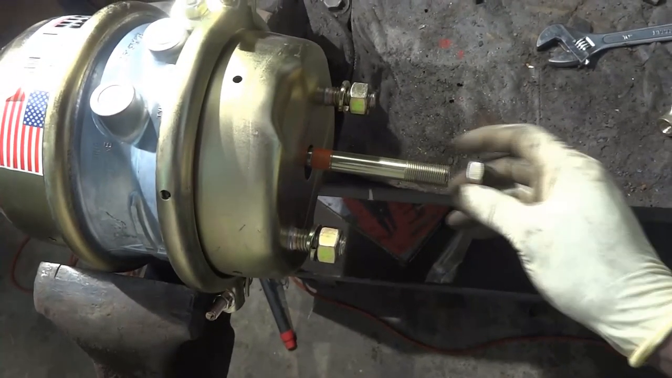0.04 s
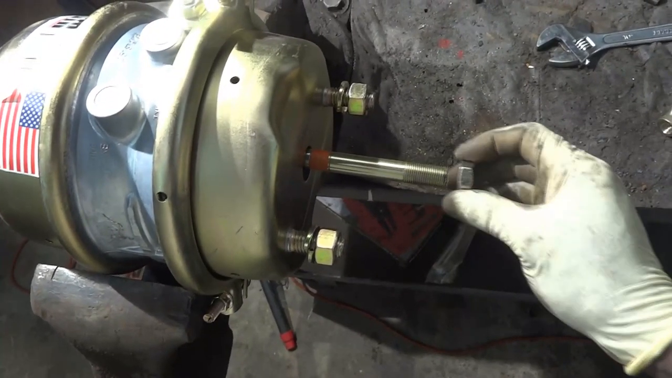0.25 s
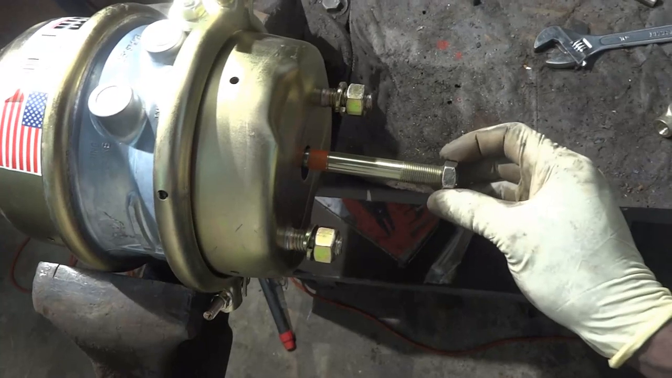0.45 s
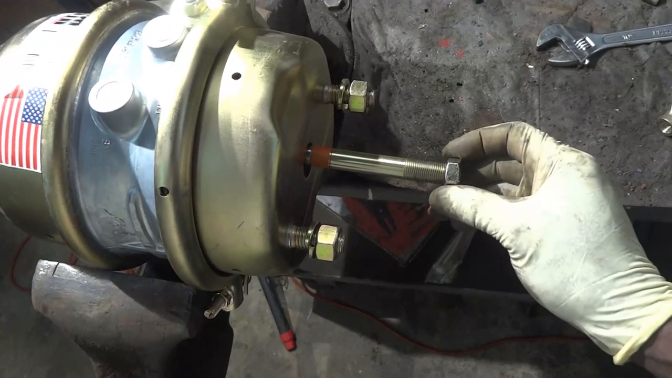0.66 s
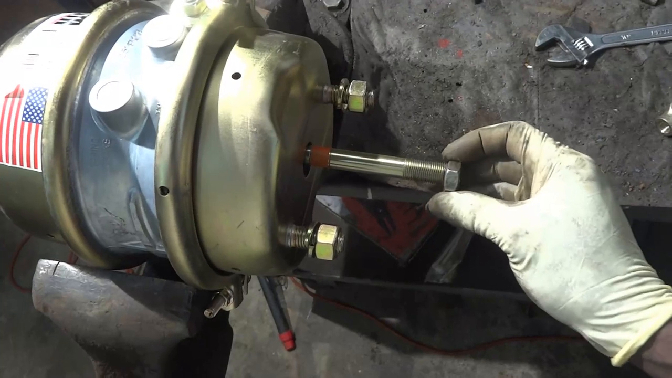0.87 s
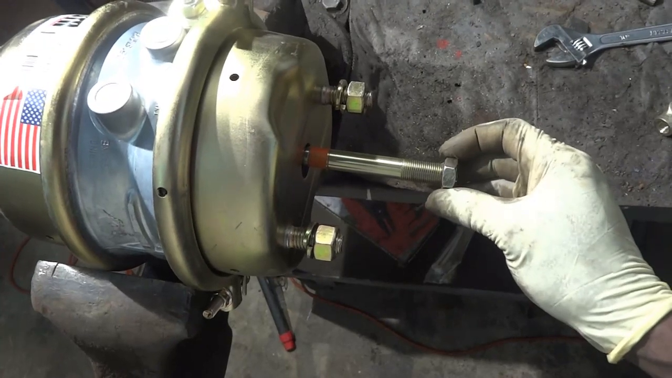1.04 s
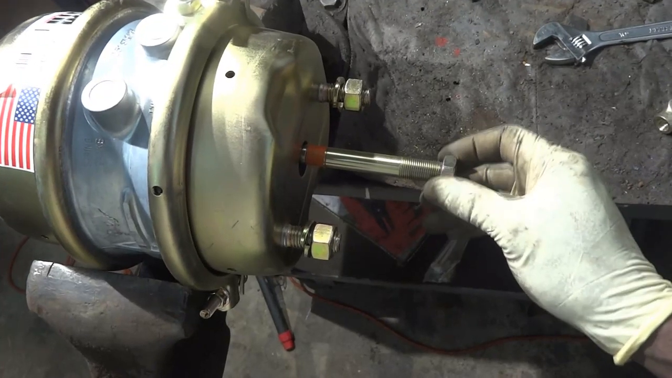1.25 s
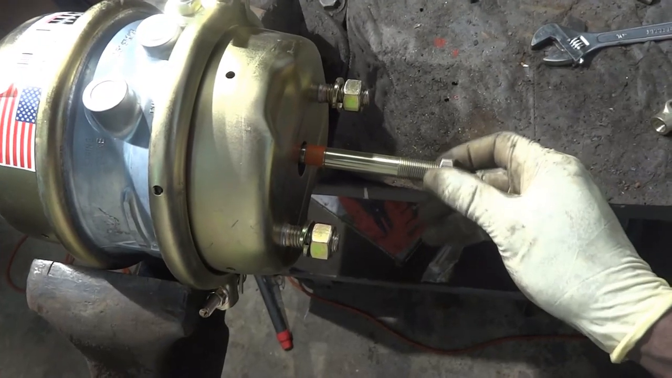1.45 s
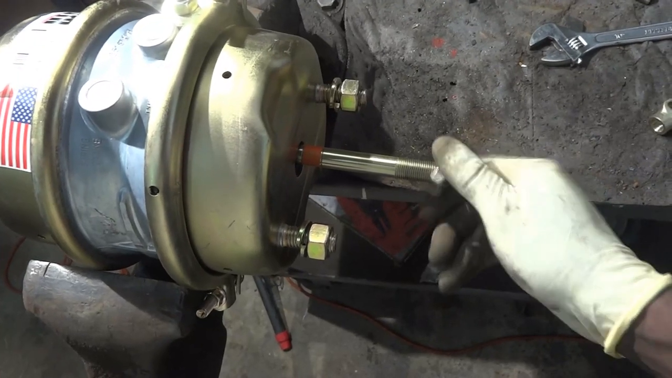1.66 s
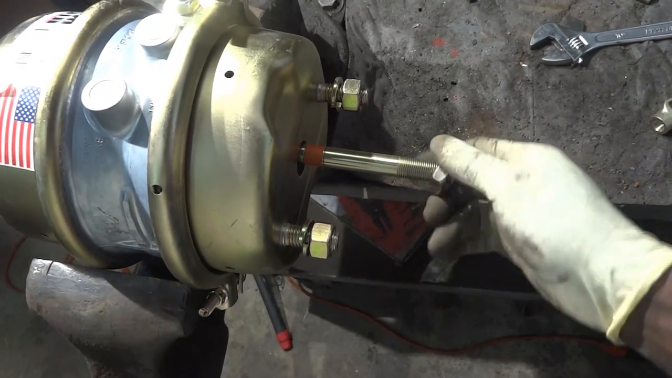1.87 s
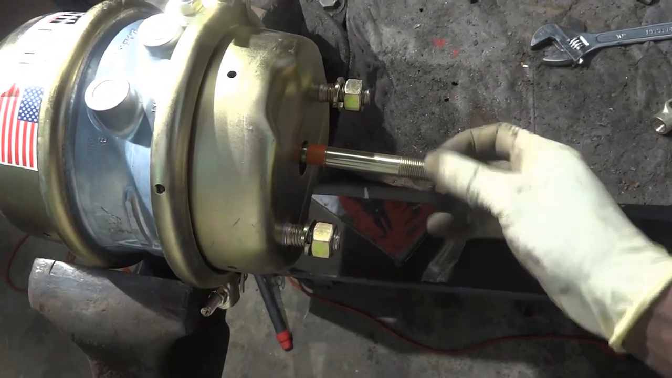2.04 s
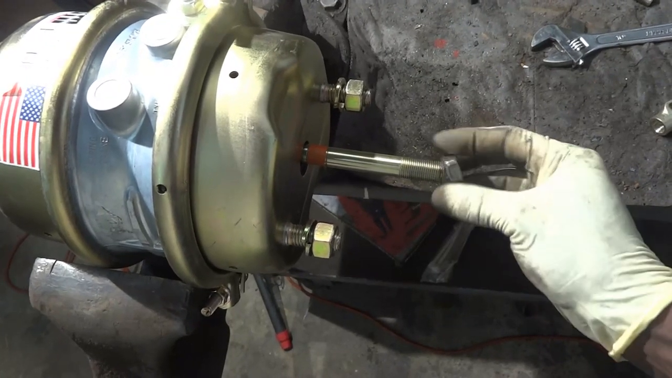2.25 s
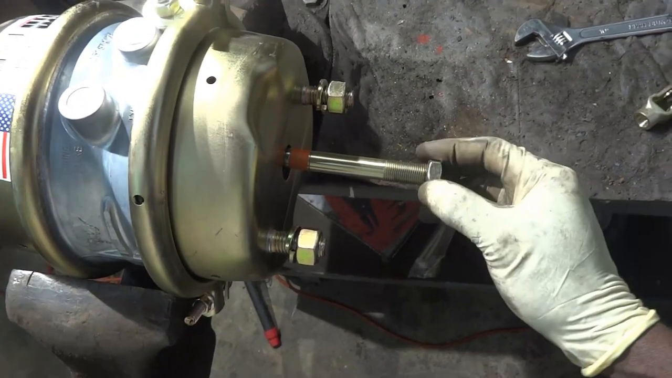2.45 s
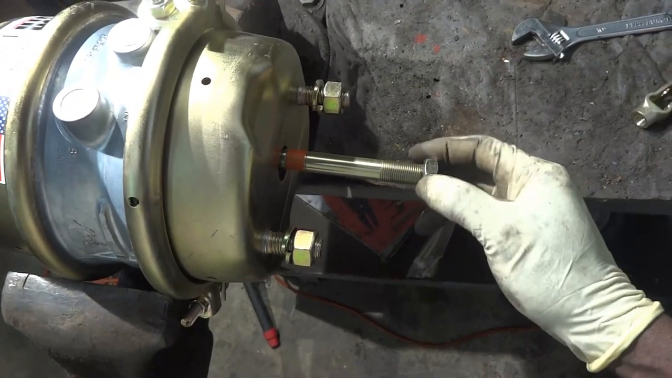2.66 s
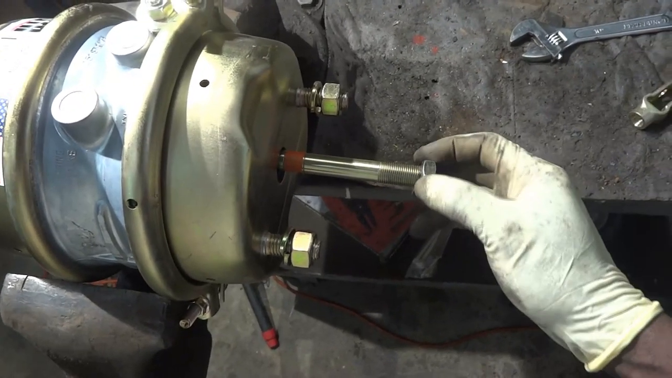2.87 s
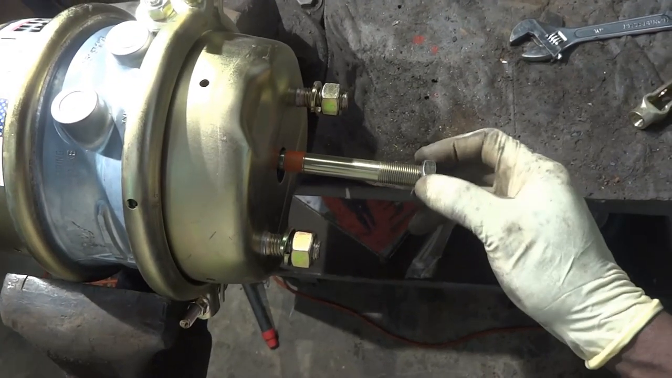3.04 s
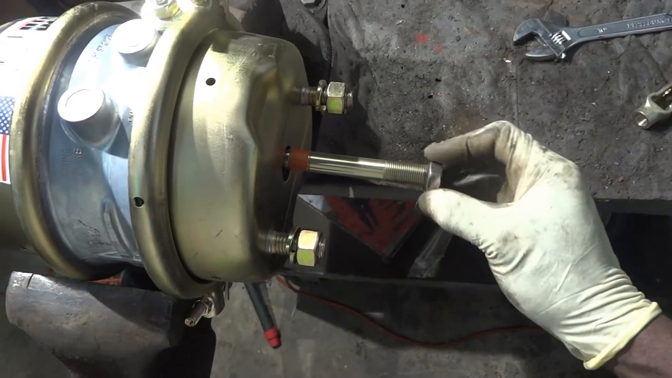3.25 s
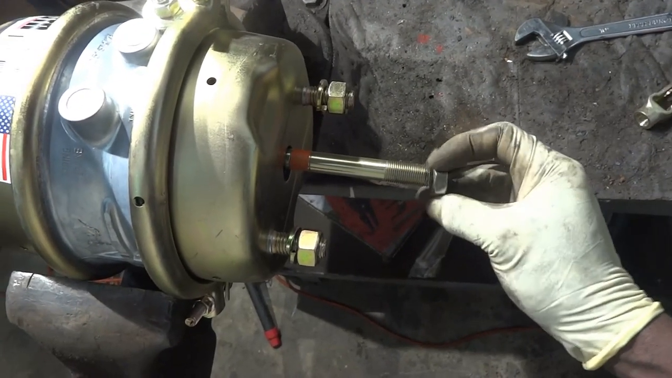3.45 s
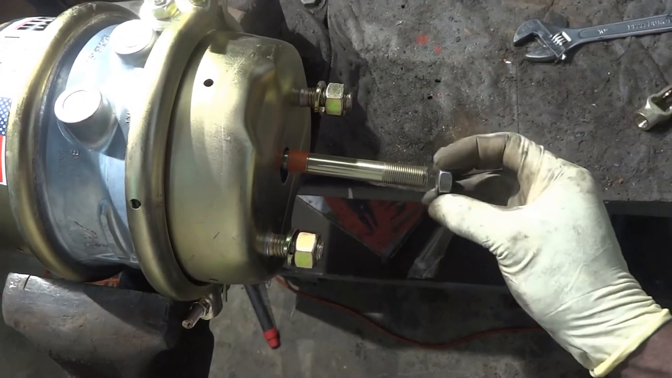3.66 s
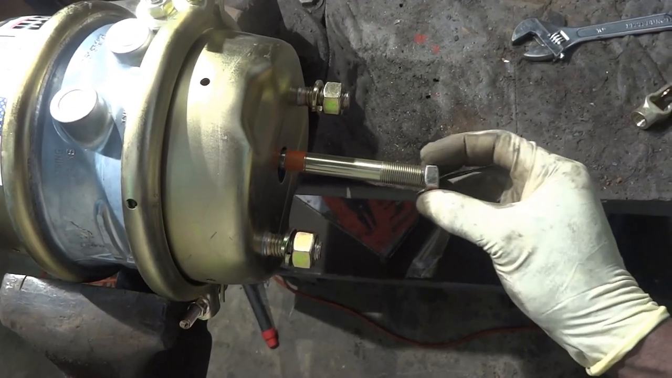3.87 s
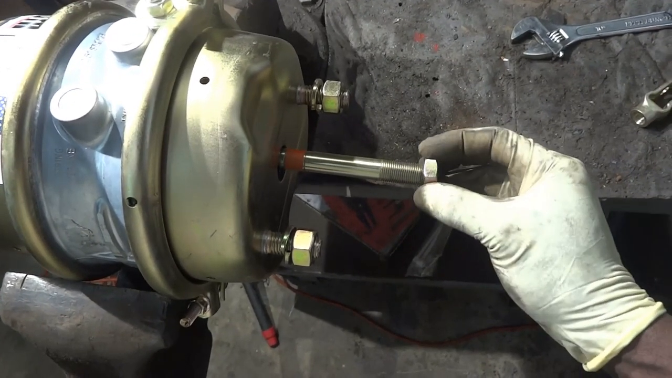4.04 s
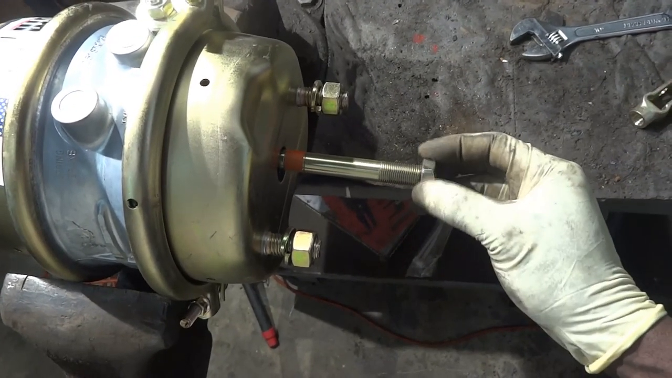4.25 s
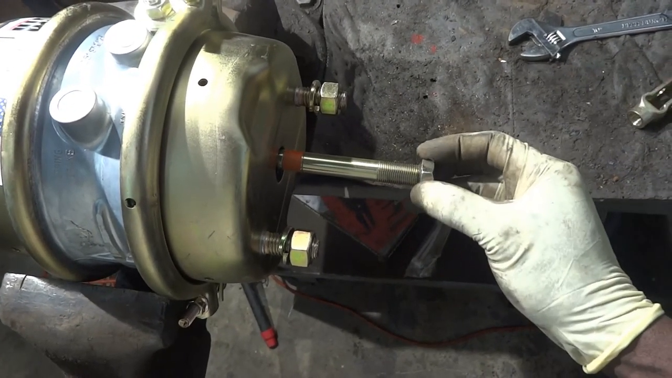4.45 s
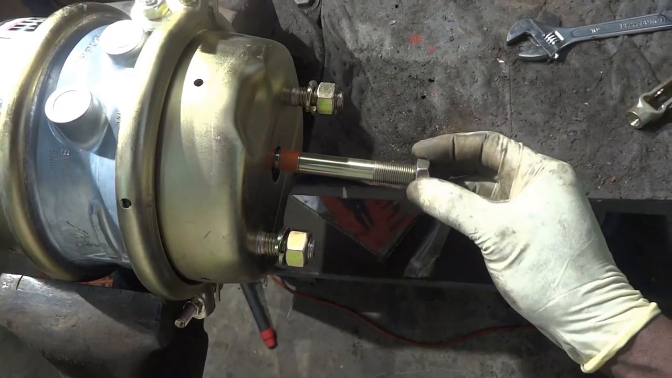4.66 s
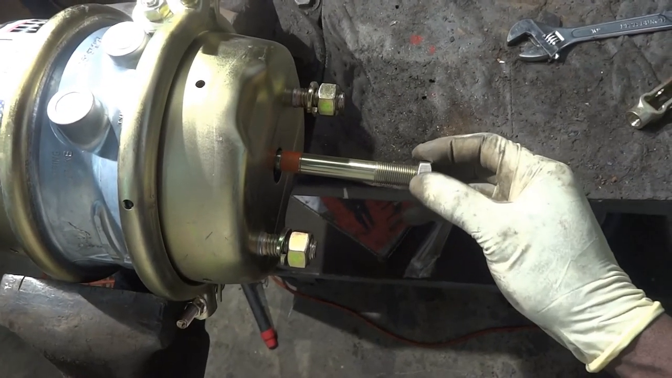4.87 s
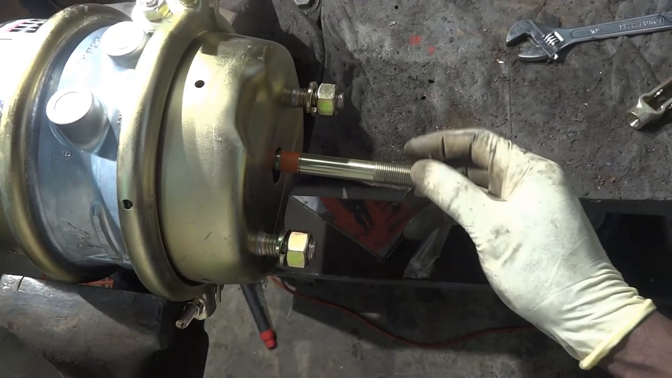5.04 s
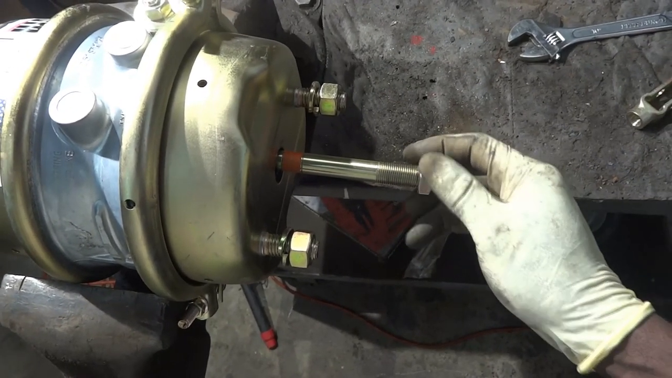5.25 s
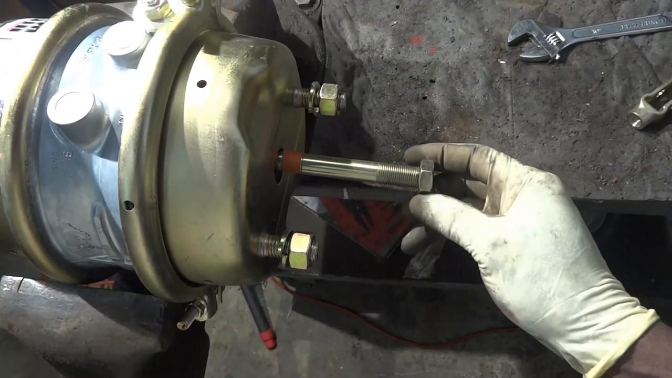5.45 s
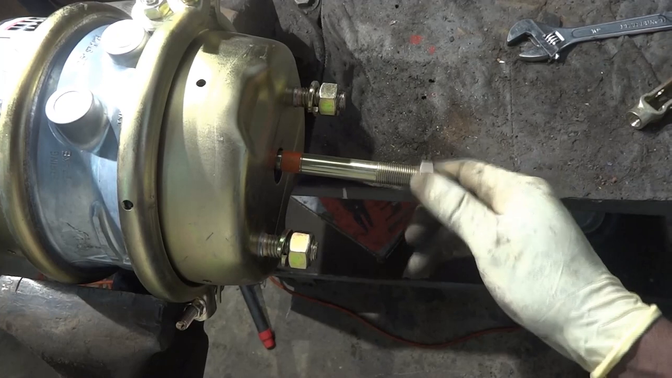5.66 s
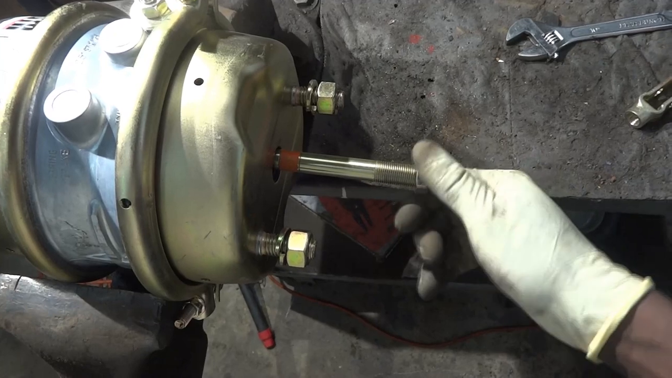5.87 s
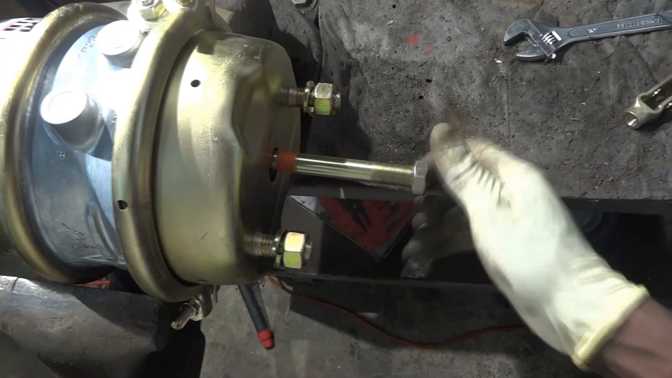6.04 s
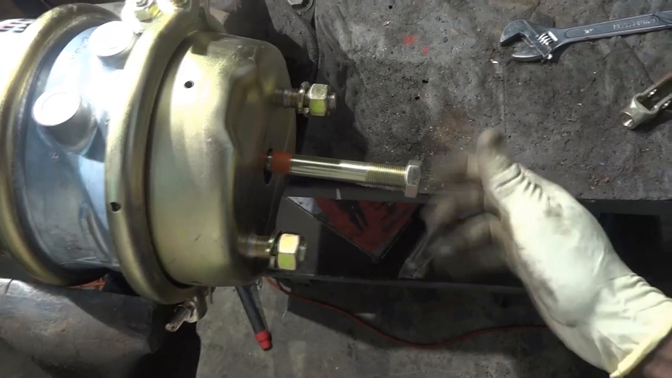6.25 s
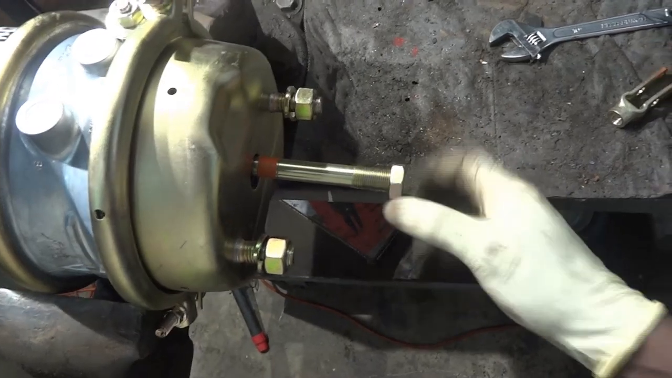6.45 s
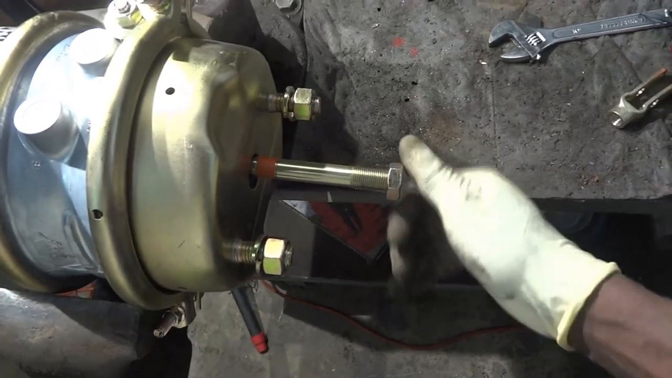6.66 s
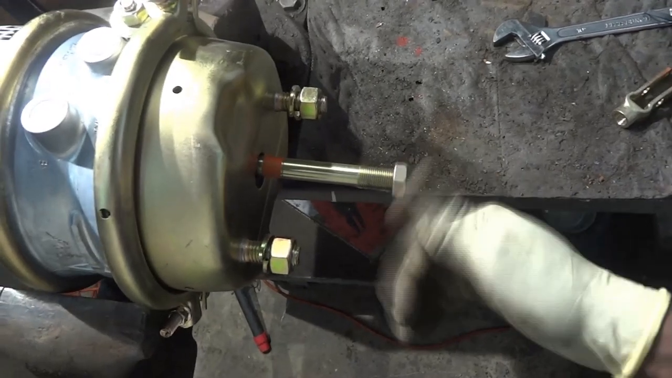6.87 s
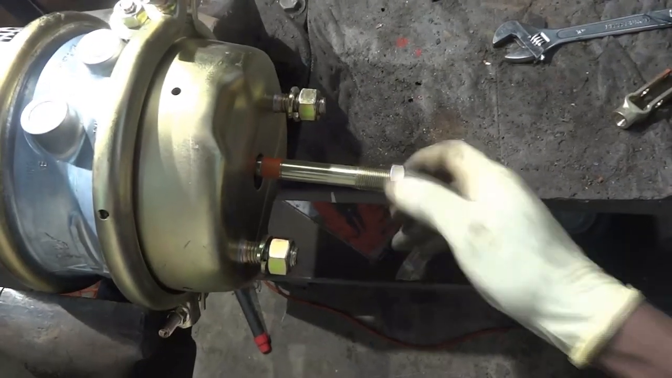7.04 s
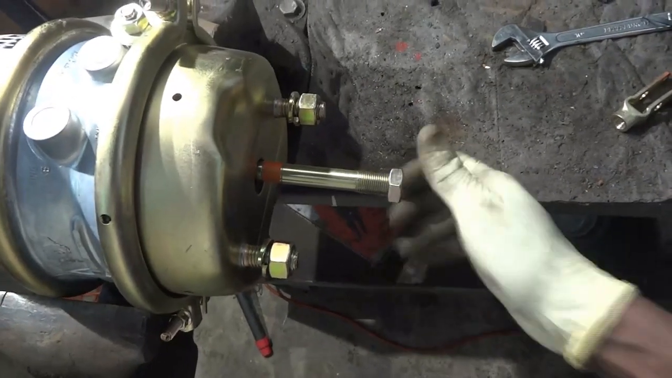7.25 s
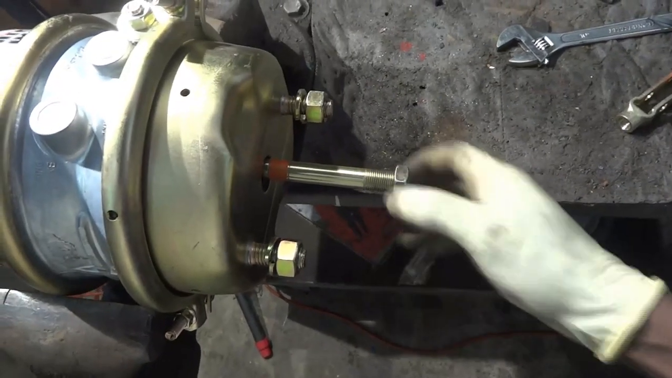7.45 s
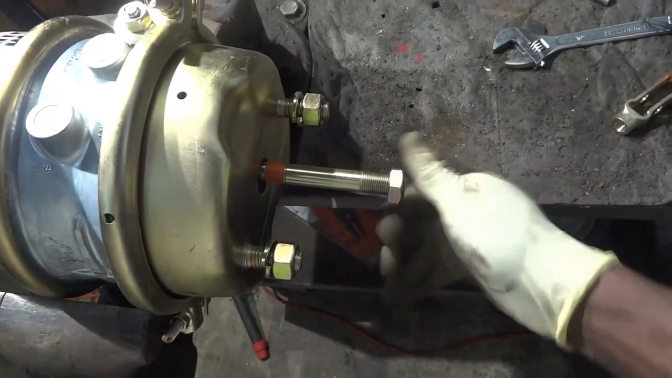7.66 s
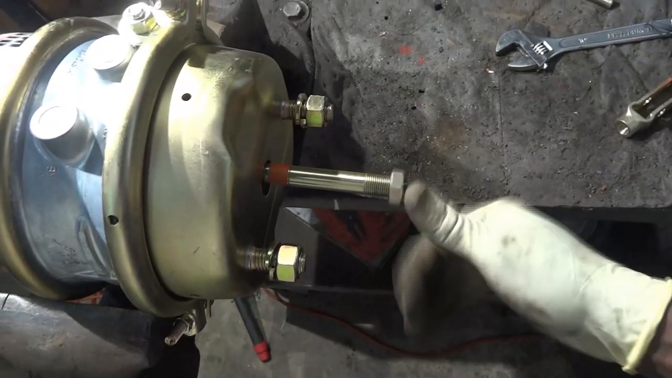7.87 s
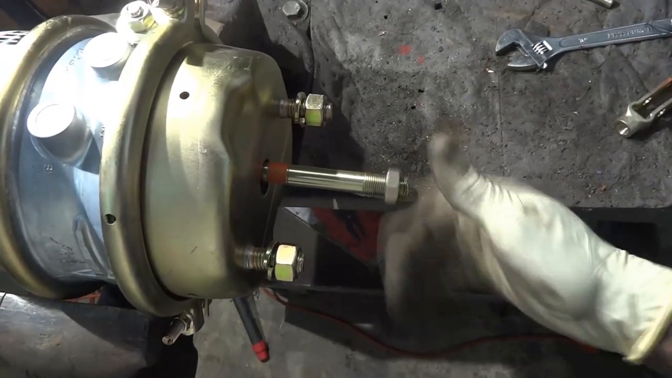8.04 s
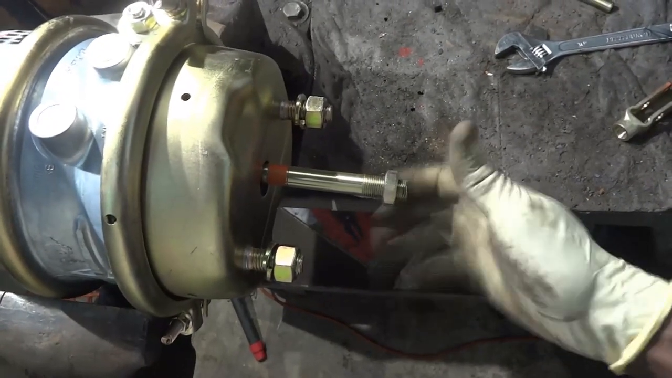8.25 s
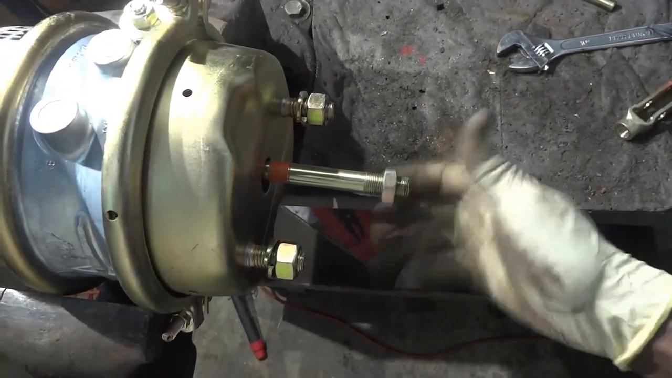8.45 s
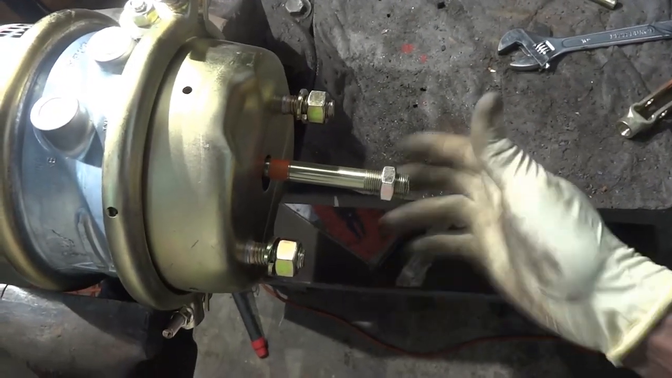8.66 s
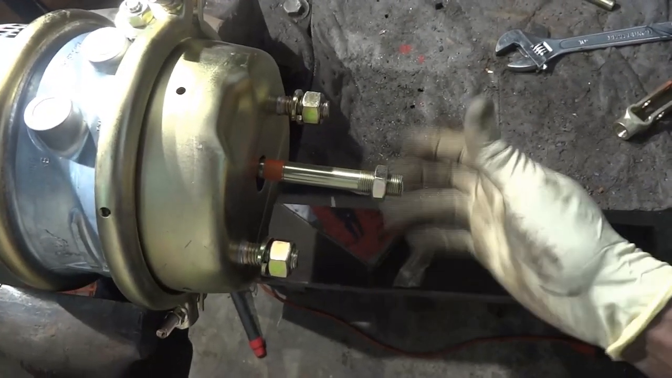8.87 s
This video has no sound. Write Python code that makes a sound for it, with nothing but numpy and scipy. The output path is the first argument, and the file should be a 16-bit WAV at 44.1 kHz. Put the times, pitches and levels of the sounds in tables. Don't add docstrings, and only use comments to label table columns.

```python
import sys
import numpy as np
from scipy import signal
from scipy.fft import rfft, irfft, next_fast_len
from scipy.io import wavfile
from scipy.ndimage import uniform_filter1d

SR = 44100
rng = np.random.default_rng(int(sys.argv[2]) if len(sys.argv) > 2 else 0)


def boost_factor(decibels):
    exponent = np.asarray(decibels, float) / 20
    return 10 ** exponent


def dump(signal):
    limited = np.clip(np.atleast_2d(signal).T, -1, 1)
    pcm = np.round(limited * 32767).astype(np.int16)
    wavfile.write(sys.argv[1], SR, pcm)


N = 392486

# (flicked [s], gripped [s], ring level [dB], rise [s])
FREE_SPINS = [
    (6.085, 6.19, -41, 0.02),
    (6.383, 6.398, -26.5, .02),
    (6.892, 6.984, -37, .01),
    (7.103, 7.146, -56, .01),
    (7.353, 7.512, -38, 0.011),
    (7.85, 8.016, -44, .005),
    (8.047, 8.196, -14.5, 0.0025),
    (8.286, 8.455, -24.5, 0.049),
    (8.515, 8.553, -29.5, 0.012),
    (8.805, 8.83, -46, .005),
]
# (frequency [Hz], level [dB], T60 [s])
HOUSING_MODES = [(108.3, -6.5, 0.17), (124.5, -6.5, 0.34), (214.8, 2.5, 0.19), (274.5, -5, 0.22),
                 (341.4, 1, 0.2), (517.4, -3, 0.11), (640, -7, 0.1)]
DRUM_MODES = [(756, -13, 0.08), (808, -10, 0.08), (851, 0.3, 0.089), (898, -0.5, 0.13), (917.8, 1, 0.13),
              (977, -5.5, 0.22), (1050, -6.5, 0.19)]
ROD_BEND_MODES = [(1728, -9, 0.17), (1936, -5, 0.14), (2025, 3.5, 0.081), (2071, 3, 0.13),
                  (2290, -7.5, 0.095), (2696, -10.5, 0.047)]
ROD_OVERTONE_MODES = [(3300, -8, .03), (3715, -10, .08), (3930, -5, .035), (4012, -4, .095),
                      (4160, -4, .04), (4320, -6, .03), (4960, -9, .025)]
NUT_MODES = [(5555, -9, 0.06), (6560, -2, 0.045), (7009, -14, .1), (7435, -4, 0.04), (7695, 3, 0.085),
             (9002, -13, 0.063), (11426, 4.5, 0.065), (14040, -9, 0.015)]
# (frequency [Hz], level [dB])
CRACK_SPECTRUM = [(300, -53), (700, -29), (1400, -22), (2800, -1), (4500, 3), (7000, -2), (11000, -5),
                  (15500, -6)]
# (frequency [Hz], level [dB])
GLOVE_SPECTRUM = [(1000, -0.5), (3000, 7.5), (8000, 9), (15500, -3)]
# (frequency [Hz], density [dB per Hz])
AIR_SPECTRUM = [(17, -36), (40, -1.5), (174, -3), (426, -4.5), (512, -6.5), (721, -10.5), (9460, -23),
                (16000, -24)]
# (frequency [Hz], side minus mid [dB])
AIR_WIDTH = [(60, -16), (300, -4), (1000, 6), (2400, 0), (5000, -2), (9000, -19)]
# (time [s], level [dB], centre [Hz])
GLOVE_SNAPS = [(2.446, -31.5, 2200), (5.92, -50, 13500), (5.94, -49, 13500), (6.117, -36, 9000),
               (6.334, -32, 9000), (6.602, -38, 10000), (6.842, -38, 12000), (7.855, -18, 13000),
               (8.78, -26, 13500), (8.808, -17, 13500), (6.501, -36, 8000), (6.515, -34, 6000),
               (6.589, -41, 9000), (7.003, -34, 11000), (7.143, -30, 12000), (7.345, -15, 12400),
               (7.521, -34, 4000), (8.205, -25, 4430), (8.315, -19, 11500), (8.775, -24, 7000)]
# (time [s], level [dB])
CHIMES = [
    (6.5, -60),
    (7.003, -52),
]
# (time [s], strength [dB], rod bending share [dB], hardness [dB], nut freedom [dB])
THREAD_TICKS = [(.382, -40, 5, -6, 9), (.78, -44, -5.5, -6, -3), (1.083, -40, -7, -7, 1.5),
                (1.184, -46, -5, .5, -15), (1.415, -43, 5, .5, -7), (1.614, -36, 3, 6.5, -3),
                (2.3, -53, 13, -14, 25), (2.378, -39, -6.5, 1.5, -4), (3.327, -43.5, 2.5, -10, 1.5),
                (3.54, -42, 9, -3.5, -1.5), (3.554, -34, 5, -11, 12), (4.145, -53, 6.5, 2.5, -11),
                (4.162, -34, -6.5, -1.5, -13), (4.261, -45, 2.5, -10.5, -3), (5.076, -49, 3, -2.5, 3)]
# (time [s], strength [dB], rod bending share [dB], hardness [dB], nut freedom [dB])
FINGER_LANDINGS = [
    (6.076, -33, -4.5, -3, -9),
    (6.334, -40.5, -3, -3, 4),
    (6.946, -25.5, -4, 1.5, 1.5),
    (7.521, -59, 16, 5, .3),
    (7.568, -30, -11, 1, 14),
    (7.805, -38.5, 4.5, 11.5, 6.5),
    (8.033, -21, -16, 4, 8),
    (8.275, -34, .5, 5, 9),
    (8.508, -32, 1, 7, 0),
    (8.741, -31, -7, 5, 0),
]
# (time [s], strength [dB], rod bending share [dB], hardness [dB], nut freedom [dB])
FLANK_SLAPS = [(6.936, -33, -4, 6, 0), (7.103, -38, -8, -6, 0), (7.367, -36, 0, 9, 3),
               (7.405, -42, 8, 0, 3), (7.44, -49, 7, 2, 10), (7.455, -45, 8, 0, 3), (7.812, -42, 9, 0, 0),
               (7.895, -42, 10, 2, 5), (7.92, -44, 9, 4, 5), (7.937, -46, 8, 4, 5), (7.968, -42, 9, 4, 8),
               (7.995, -46, 10, 0, 5), (8.326, -32, -4, 8, 5), (8.337, -36, -2, 8, 0),
               (8.563, -28, -4, 8, 5), (8.774, -35, -4, 6, 3), (.97, -52, 0, -6, 0), (2.6, -54, 2, -12, 0),
               (3.13, -46, 4, -10, 0), (3.445, -53, 5, -10, 0)]
# (time [s], build-up [ms], strength [dB], hardness [dB])
SEEKING_SCRAPES = [(.495, 8, -55, -15), (.65, 5.5, -35.5, -7.5), (.829, 6.3, -34.5, -12),
                   (.949, 15.6, -56, -4), (1.006, 6, -44, -6), (1.265, 7.6, -38.5, -13),
                   (1.3, 1.6, -48, -13), (1.485, 16, -38, -12), (1.56, 11, -38, -12),
                   (1.652, 17.2, -35.5, -5), (1.695, 15.7, -38.5, -5), (1.73, 10.1, -35.5, -7.5),
                   (1.86, 5.1, -32.5, -13), (1.907, 4.6, -27, -15), (2.002, 27.5, -36, -17),
                   (2.054, 4.9, -39, -16), (2.089, 26.8, -28.5, -7), (2.325, 4, -42, -3),
                   (2.443, 1.9, -43, -18), (2.485, 2.6, -46, -20), (2.585, 6.3, -56, -15),
                   (3.104, 21.2, -37, -18.5), (3.221, 4.1, -50, -27), (3.432, 14.7, -43, -22),
                      (3.598, 3.15, -45, -6.5), (3.96, 4.2, -46, -25), (4.01, 12.2, -38, -6.5),
                      (4.25, 1.7, -50, -19), (4.286, 4, -42.5, -18), (4.426, 5.8, -38, -20),
                      (4.66, 2.9, -48, -20), (4.901, 6.1, -51, -31), (5.224, 2.8, -55, -22),
                      (5.42, 20.1, -49.5, -22), (5.475, 17.8, -39, -9), (5.656, 2.5, -48, -11),
                      (5.67, 32.6, -37.5, -10), (5.841, 3.4, -50, -27), (5.995, 14.8, -47.5, -22)]
# (time [s], build-up [ms], strength [dB], hardness [dB], nut freedom [dB])
RACE_SCRAPES = [(6.088, 5, -36, -12, 0), (6.124, 4, -33, 2, -8), (6.131, 9, -30, 2, -3),
                (6.345, 6, -41, 0, -3), (6.352, 7, -31, 4.5, 0), (6.368, 6, -27, 5.5, -2),
                (6.381, 5, -25, 4.5, 0), (6.617, 14, -42, -4, 0), (6.642, 7, -34, -6, -6),
                (6.657, 8, -33, -1, -6), (6.858, 9, -37, -5, 0), (6.874, 5, -26, 6, 1),
                (6.894, 16, -28.5, 5, -2), (6.928, 8.1, -28.5, .3, 0), (7.054, 11, -47, -12, 0),
                (7.096, 4, -31, -9, 0), (7.128, 19, -35.5, -10, 0), (7.16, 3.4, -37, -7, 0),
                (7.309, 8, -48, -8, -5), (7.325, 5, -29, 2, -12), (7.348, 3.9, -32.5, 2.5, -5),
                (7.362, 4, -31, 5, 5), (7.383, 5, -34, 3, 9), (7.4, 24, -36, -.5, 4),
                (7.59, 24, -35, -6, 8), (7.832, 5, -36, 0, -5), (7.849, 3.5, -27.5, 8, 7),
                (7.885, 22, -37, 1, 5), (8.049, 10, -33, 11, 5), (8.062, 4, -33, 7, 12),
                (8.082, 6, -28.5, 2, 5), (8.098, 10.1, -24.5, .5, 11), (8.32, 5.1, -30.5, 4, 8),
                (8.33, 7, -25.5, 5, 4), (8.558, 6.5, -22, 4.5, 5), (8.766, 6, -31, -1.5, 0),
                (8.777, 6, -38, 1, 9), (8.797, 3.5, -30, 7, 3), (8.803, 7, -26, 8.5, 3),
                (8.845, 8, -36, 4, 7)]
# (time [s], shove [dB], time to ease 20 dB [s], finger slide [dB], nut wobble [dB])
HAND_TWISTS = [(.01, -56, .15, -75, -76), (.82, -54, .9, -80, -67), (1.55, -55, .3, -74, -68),
               (1.73, -40, .2, -66, -66), (1.89, -45, .5, -61, -66), (2.12, -42, .15, -62, -67),
               (2.33, -48, .3, -76, -60), (3.13, -47, .8, -73, -69), (3.58, -58, .35, -76, -68),
               (4.03, -47, .3, -79, -60), (4.3, -60, .9, -82, -70), (4.92, -53, .4, -74, -68),
               (5.06, -48, .22, -69, -63), (5.68, -45, .3, -70, -63)]
# (time [s], shove [dB], time to ease 20 dB [s], finger slide [dB], nut wobble [dB])
HAND_FLICKS = [(6.09, -48, .3, -55, -60), (6.13, -46, .35, -48, -64), (6.345, -36, .2, -51, -58),
               (6.37, -33, .16, -44, -55), (6.67, -50, .3, -56, -62), (6.86, -39, .3, -51, -57),
               (7.11, -52, .4, -60, -60), (7.16, -53, .4, -58, -64), (7.325, -37, .3, -50, -50),
               (7.365, -39, .3, -46, -45), (7.6, -49, .4, -56, -59), (7.815, -42, .3, -49, -48),
               (7.855, -40.5, .4, -46, -37), (8.055, -44, .6, -39, -50), (8.29, -39, .3, -46, -48),
               (8.34, -38, .3, -44, -44), (8.52, -40, .3, -47, -55), (8.57, -30, .1, -36, -48),
               (8.76, -34, .3, -48, -55), (8.82, -33.5, .1, -37.5, -40)]
# (time [s], glove rustle [dB])
HAND_RETURNS = [(.15, -71), (2.75, -72), (5.1, -67), (5.92, -69), (6.23, -68), (6.52, -67), (6.62, -61),
                (6.77, -69), (7.03, -64), (7.22, -69), (7.48, -66), (7.7, -61), (7.97, -62), (8.2, -64),
                (8.45, -62), (8.69, -60)]
# (time [s], main mode [dB], upper mode re main [dB], rocking
# re main [dB])
HOUSING_JOLTS = [(0.577, -60, -7, -11), (0.829, -51, -6, -10), (1.576, -46, -18, -22),
                 (1.661, -48, -8, -13), (1.707, -44, -4, -11), (1.918, -43, -4, -24),
                 (2.005, -48, -3, -14), (2.104, -44, -5, -13), (2.304, -52, -13, -12),
                 (2.494, -51, -10, -13), (3.131, -43, -6, -25), (3.288, -49, -11, -17),
                 (3.427, -50, -10, -15), (3.619, -55, -15, -14), (4.021, -42, -16, -23),
                 (4.164, -52, -6, -13), (4.293, -48, -8, -19), (4.718, -56, -11, -13),
                 (4.911, -54, -3, -11), (5.025, -49, -13, -15), (5.433, -56, -6, -12),
                 (5.706, -41, -13, -25),
                 (6.097, -51, 0, -6), (6.199, -54, -1, -8), (6.344, -40, -2, -8), (6.419, -49, -1, -2),
                  (6.598, -49, -12, -7), (6.659, -50, -11, -9), (6.854, -43, 0, -4), (6.949, -46, -4, -6),
                  (7.099, -56, -2, -3), (7.32, -42, -1, -9), (7.399, -44, -9, -7), (7.572, -46, -8, -9),
                  (7.813, -43, -3, -9), (7.881, -50, 3, -5), (8.034, -51, 9, 0), (8.1, -39, -3, -13),
                  (8.287, -41, -1, -8), (8.336, -41, 2, -9), (8.524, -40, 1, -11), (8.565, -35, 0, -25),
                  (8.745, -37, -5, -11), (8.809, -37, -2, -16)]

SIDES = np.array([[1], [-1]])
TOP_HZ = 15900


def touches():
    tick_s, tick_db, tick_rod_db, tick_hard_db, tick_free_db = np.transpose(
        THREAD_TICKS + FINGER_LANDINGS + FLANK_SLAPS)
    tick_ms, landing_ms = 1.1, 0.55
    landing = np.arange(len(tick_s)) >= len(THREAD_TICKS)
    tick_build_ms = np.where(landing, landing_ms, tick_ms)

    seeking = [(*row, 0) for row in SEEKING_SCRAPES]
    scrape_s, scrape_build_ms, scrape_db, scrape_hard_db, scrape_free_db = np.transpose(seeking + RACE_SCRAPES)
    scrape_rod_db = -5 + 0.18 * scrape_hard_db

    start_s = np.r_[tick_s, scrape_s]
    build_ms = np.r_[tick_build_ms, scrape_build_ms]
    drum_db = np.r_[tick_db, scrape_db]
    rod_db = drum_db + np.r_[tick_rod_db, scrape_rod_db]
    overtone_db = drum_db + np.r_[tick_hard_db, scrape_hard_db]
    nut_db = -50.5 + 1.4 * (overtone_db + 40) + np.r_[tick_free_db, scrape_free_db]
    return start_s, build_ms, drum_db, rod_db, overtone_db, nut_db


def knocks():
    start_s, build_ms, drum_db, rod_db, overtone_db, nut_db = (c[:, None] for c in touches())
    count = 14
    place, size = np.moveaxis(rng.random((len(start_s), count, 2)), -1, 0)
    late = 2.5 * (np.arange(count) + place) / count
    at = ((start_s + late * np.maximum(build_ms, 0.1) / 1000) * SR).astype(int)

    swell_db = -12.0 * np.maximum(1 - late, 0) - 18.6 * np.maximum(late - 1, 0)
    swell_db = swell_db + 11.0 * (size ** 2 - 0.4)
    swell_db = swell_db + 0.033 * build_ms

    tight = np.exp(-build_ms / 0.9)
    crack_db = 10 * np.log10(boost_factor(2 * nut_db) + boost_factor(2 * overtone_db - 12)) + 7 * tight
    parts = (at, drum_db - 4.5 + swell_db, rod_db - 4 + swell_db, overtone_db - 3 + swell_db,
             nut_db - 5 - 8.5 * tight + swell_db, crack_db - 9.5 + swell_db)
    return [part.ravel() for part in parts]


def rattle(drum_db, bend_db, bright_db):
    place, size = rng.random((5000, 2)).T
    at = (place * (N - 1)).astype(int)
    spread_db = np.minimum(-4.0 * np.log(1 - size), 14)
    high_db = bright_db[at] + spread_db
    nut_db = high_db - 10 + 0.21 * (bright_db[at] + 42)
    return at, drum_db[at] + spread_db - 12, bend_db[at] + spread_db - 11.5, high_db - 10, nut_db, high_db - 11


def contacts(at, drum_db, bend_db, overtone_db, nut_db, crack_db):
    drum = above(ring(at, boost_factor(drum_db), DRUM_MODES, 1.27, rough_db=3.2), 460)
    bend = above(ring(at, boost_factor(bend_db), ROD_BEND_MODES, 3.2, rough_db=3.5), 1950)
    overtones = ring(at, boost_factor(overtone_db), ROD_OVERTONE_MODES, 3.5, rough_db=3.0)
    nut = ring(at, boost_factor(nut_db), NUT_MODES, 4.0)
    return drum + bend, above(overtones + nut, 3160) + crack(at, boost_factor(crack_db + 3.5))


def ring(at, size, modes, scatter_db, rough_db=2.0):
    chance = rng.standard_normal((len(at), len(modes), 2))
    total = np.sqrt(sum(boost_factor(db) ** 2 for _, db, _ in modes))
    rough = boost_factor(rough_db * np.clip(slow_noise(150), -3, 1.5))
    out = np.zeros(N)
    for k, (hz, db, t60_s) in enumerate(modes):
        blow = size * boost_factor(scatter_db * chance[:, k, 0]) * np.sign(chance[:, k, 1])
        push = np.bincount(at, blow, minlength=N)
        r = np.exp(-np.log(1000) / (t60_s * SR))
        w = 2 * np.pi * hz / SR
        mode = signal.lfilter([0, r * np.sin(w)], [1, -2 * r * np.cos(w), r * r], push)
        out += boost_factor(db) / total * mode * np.roll(rough, k * SR)
    return out


def crack(at, size):
    push = np.zeros(N)
    np.add.at(push, at, size ** 2)
    power = fade(push, 0.0059) + boost_factor(-30) * fade(push, 0.073)
    return colour(np.sqrt(power) * rng.standard_normal(N), CRACK_SPECTRUM)


def nut_ring(t):
    ring_hz, free_t60_s, grip_t60_s = 7163, 0.9, 0.05
    left_db, left_t60_s = -18, 0.35
    slow = t[::16]
    shape = np.zeros(len(slow))
    for flick_s, grip_s, db, rise_s in FREE_SPINS:
        free = np.clip(slow, flick_s, grip_s) - flick_s
        held = np.maximum(slow - grip_s, 0)
        remainder = boost_factor(left_db - 60 * held / left_t60_s) * (held > 0)
        choke = boost_factor(-60 * held / grip_t60_s) + remainder
        spin = boost_factor(db + 3 - 60 * free / free_t60_s) * (1 - np.exp(-free / rise_s))
        shape = np.maximum(shape, spin * choke)
    flutter = boost_factor(0.6 * slow_noise(300))
    return np.interp(t, slow, shape) * flutter * np.sin(2 * np.pi * ring_hz * t)


def housing(at, drum_db, push_db):
    shake = (rng.random(1800) * (N - 1)).astype(int)
    size = np.concatenate([boost_factor(push_db[shake] - 11), boost_factor(drum_db - 21)])
    rung = ring(np.concatenate([shake, at]), size, HOUSING_MODES, 4.0, rough_db=0.6)
    return above(above(rung, 75), 75)


def jolts():
    s, main_db, upper_db, rocking_db = np.transpose(HOUSING_JOLTS)
    at = (s * SR).astype(int)
    rocking_modes = [(128, 0, 0.7), (106, -4, 0.2)]  # Hz, dB, T60 s
    shares = [(HOUSING_MODES[2:4], main_db + 1.5),
              (HOUSING_MODES[4:5], main_db + upper_db + 3),
              (rocking_modes, main_db + rocking_db + 2.5)]
    rung = sum(ring(at, boost_factor(db), modes, 1.5, rough_db=1.5) for modes, db in shares)
    return above(uniform_filter1d(rung, size=40), 70)


def hand(t, moves, rise_s, slide_s, run_s):
    s, shove_db, ease_s, slide_db, wobble_db = (c[:, None] for c in np.transpose(moves))
    before_db = 20 * np.maximum(s - t, 0) / rise_s
    after = 20 * np.maximum(t - s, 0)
    shapes = (shove_db - before_db - after / ease_s,
              slide_db - before_db - after / slide_s,
              wobble_db - before_db - after / run_s)
    return np.array([shape.max(axis=0) for shape in shapes])


def gestures(t):
    slow = t[::128]
    twist = hand(slow, HAND_TWISTS, rise_s=0.12, slide_s=0.13, run_s=0.9)
    flick = hand(slow, HAND_FLICKS, rise_s=0.035, slide_s=0.08, run_s=0.6)
    floor_db = [[-78], [-82], [-80]]
    shove_db, slide_db, wobble_db = np.maximum(np.maximum(twist, flick), floor_db)
    s, return_db = (c[:, None] for c in np.transpose(HAND_RETURNS))
    return_s = 0.22
    slide_db = np.maximum(slide_db, (return_db - 20 * abs(slow - s) / return_s).max(axis=0))
    return [np.interp(t, slow, curve) for curve in (shove_db, slide_db, wobble_db)]


def glove(rustle_db):
    grain = boost_factor(3.6 * unit(uniform_filter1d(rng.standard_normal(N), size=40)))
    mid, side = (unit(colour(grain * rng.standard_normal(N), GLOVE_SPECTRUM)) for _ in range(2))
    out = boost_factor(rustle_db + 7) * (mid + boost_factor(-26) * side * SIDES)
    t = np.arange(200) / SR
    for s, db, hz in GLOVE_SNAPS:
        band = signal.butter(1, [0.6 * hz, min(1.2 * hz, TOP_HZ)], "band", fs=SR, output="sos")
        mid, side = signal.sosfilt(band, rng.standard_normal((2, len(t))) * boost_factor(-60 * t / 0.0062))
        start = int(s * SR)
        out[:, start:start + len(t)] += boost_factor(db) * (mid + 0.5 * side * SIDES)
    return out


def chime():
    s, db = np.transpose(CHIMES)
    return ring((s * SR).astype(int), boost_factor(db), [(3200, 0, 0.3)], 0, rough_db=4.0)


def room(x, t60_s, wet_db):
    t = np.arange(int(t60_s * SR)) / SR
    tail = rng.standard_normal((2, len(t))) * boost_factor(-60 * t / t60_s) * (t > 0.003)
    tail = tail / np.sqrt(np.sum(tail[0] ** 2))
    return boost_factor(wet_db) * signal.oaconvolve(x[None], tail, axes=1)[:, :N]


def air():
    mid, side = (colour(rng.standard_normal(N), AIR_SPECTRUM) for _ in range(2))
    gain = boost_factor(-59.5) / np.sqrt(np.mean(mid ** 2))
    return gain * (mid + SIDES * colour(side, AIR_WIDTH))


def colour(x, points):
    hz, db = np.transpose(points)
    size = next_fast_len(N, real=True)
    f = np.maximum(np.arange(size // 2 + 1) * SR / size, 1)
    gain = boost_factor(np.interp(np.log(f), np.log(hz), db))
    return irfft(rfft(x, size) * gain, size)[:N]


def slow_noise(samples):
    return unit(uniform_filter1d(uniform_filter1d(rng.standard_normal(N), size=samples), size=samples))


def unit(x):
    return x / np.sqrt(np.mean(x ** 2))


def fade(x, t60_s):
    return signal.lfilter([1], [1, -np.exp(-np.log(1000) / (t60_s * SR))], x)


def above(x, hz):
    return signal.sosfilt(signal.butter(2, hz, "high", fs=SR, output="sos"), x)


def scene():
    t = np.arange(N) / SR
    push_db, rustle_db, bend_db = gestures(t)
    drum_db = np.maximum(push_db - 8, bend_db - 3)
    bright_db = bend_db - 11 - 0.15 * (bend_db + 55)
    blows = knocks()
    rattles = rattle(drum_db, bend_db, bright_db)
    soft, bright = contacts(*(np.concatenate(pair) for pair in zip(blows, rattles)))
    at, knock_drum_db = blows[:2]
    soft = soft + housing(at, knock_drum_db, push_db) + jolts()
    bright = bright + nut_ring(t) + chime()
    side = 0.29 * np.gradient(soft) + 0.095 * bright
    near = soft + bright + SIDES * side
    return near + room(soft, 0.27, -14) + room(bright, 0.13, -20) + glove(rustle_db) + air()


def top_cut(x):
    return signal.sosfilt(signal.butter(12, 16800, fs=SR, output="sos"), x)


def record(dry):
    rounded = 0.7 * np.tanh(dry / 0.7)
    low_pass = signal.ellip(7, 0.2, 55, TOP_HZ, fs=SR, output="sos")
    mix = signal.sosfilt(low_pass, rounded)
    return top_cut(mix)


dry = scene()
out = record(dry)
dump(out)
```